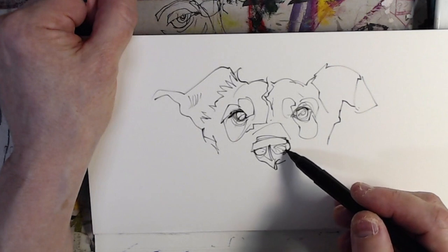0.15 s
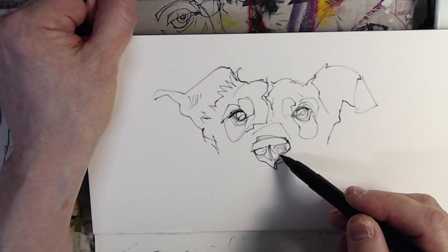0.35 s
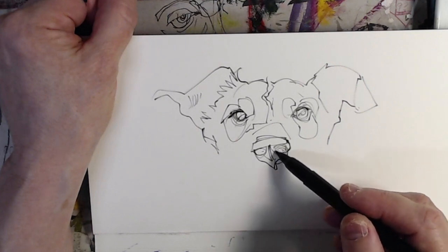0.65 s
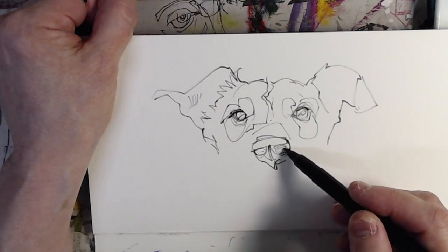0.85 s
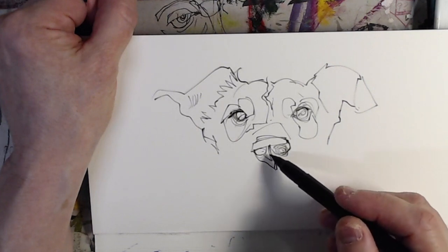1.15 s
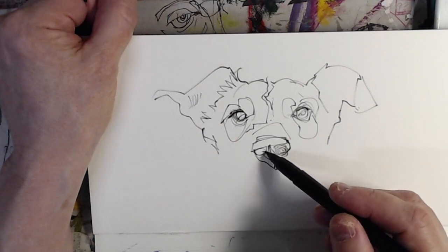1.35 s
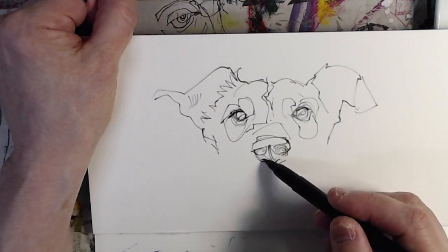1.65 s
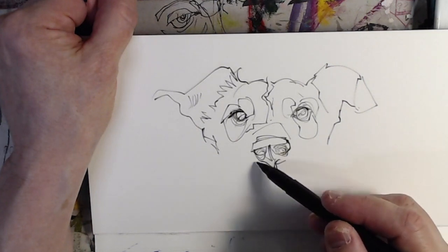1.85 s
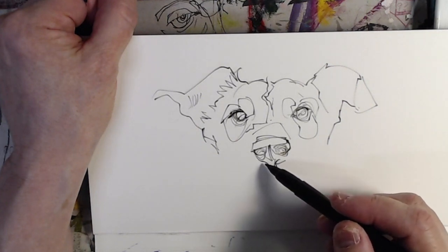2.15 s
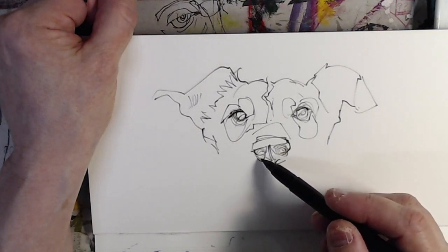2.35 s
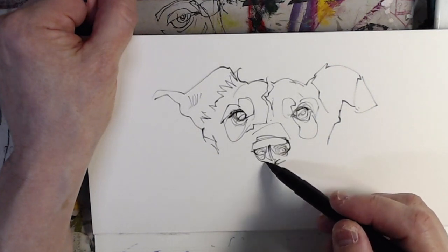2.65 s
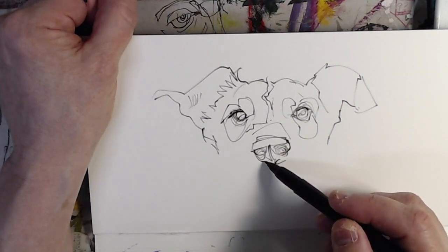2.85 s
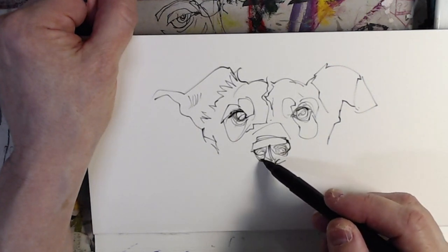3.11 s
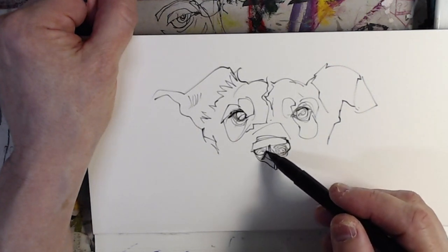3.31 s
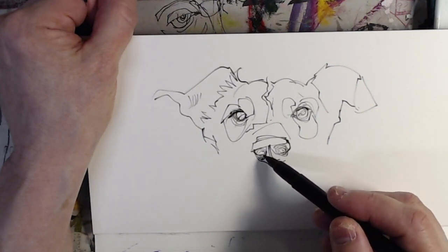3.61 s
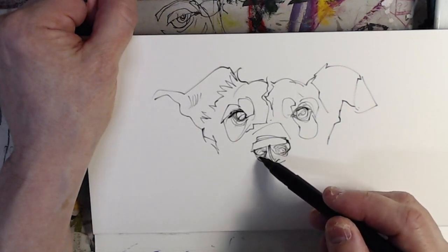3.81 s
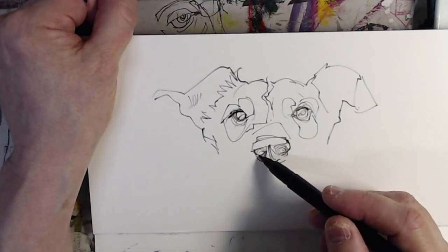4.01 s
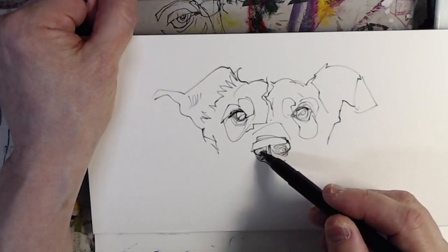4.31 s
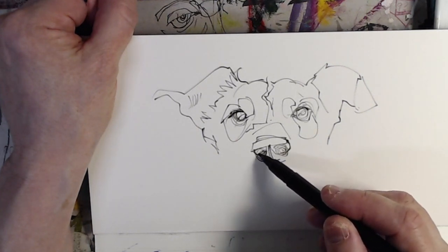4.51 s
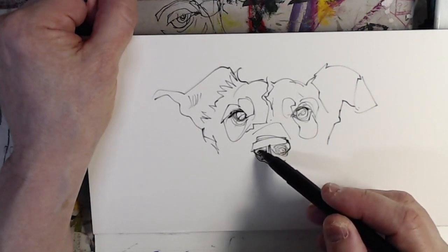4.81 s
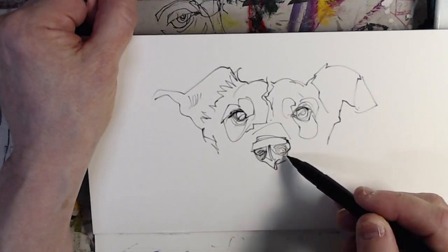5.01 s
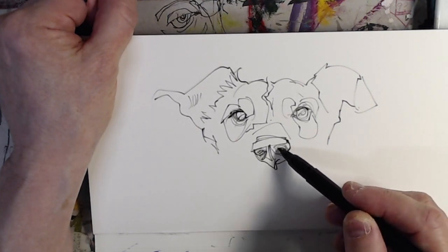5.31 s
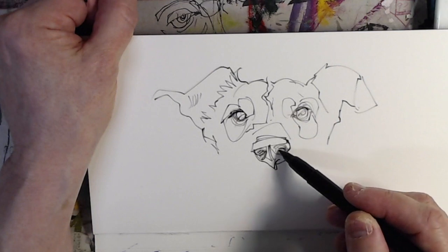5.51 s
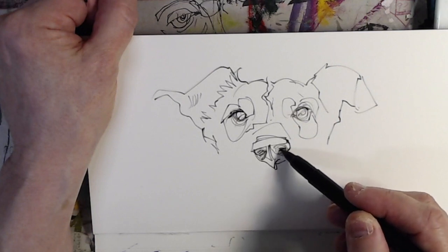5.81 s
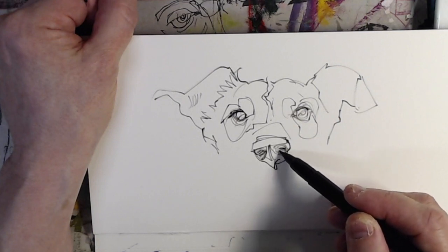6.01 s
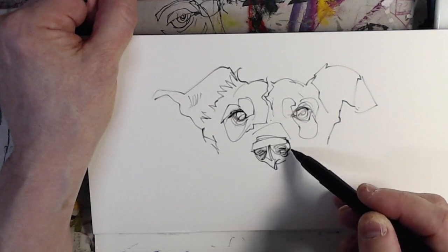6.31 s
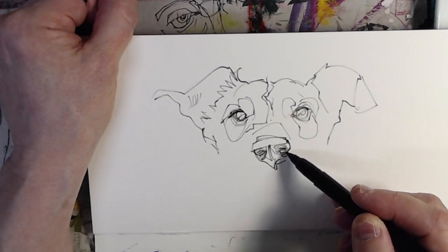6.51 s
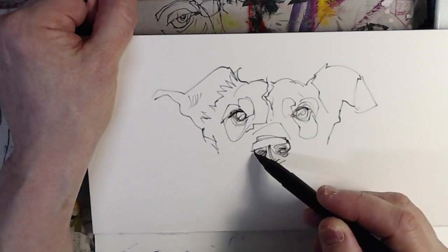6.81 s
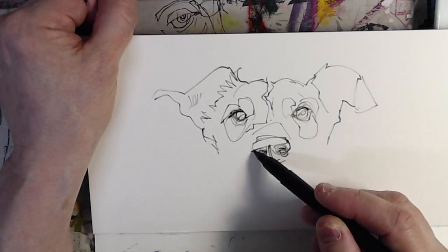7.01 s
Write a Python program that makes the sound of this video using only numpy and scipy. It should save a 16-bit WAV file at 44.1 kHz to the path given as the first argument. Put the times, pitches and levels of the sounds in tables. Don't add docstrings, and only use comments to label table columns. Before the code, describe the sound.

A close mono pickup in a small, quiet room, with muffled upper treble. Throughout, distant engines and traffic drone through the walls: a deep hum around 70 and 140 Hz, throbbing and wavering, with soft tyre wash swelling near 0.3 and 5.3 s, plus very faint hiss and electronic whine. From 0.2 to 1.0 s a dry fiber tip scratches grainy paper in slow, uneven strokes, with small dull snaps around 0.25 and 0.8. A soft skin brush passes at 1.1; more gentle strokes follow from 1.4 to 1.9. The pen then rests. At about 2.95 a tiny high stuttering squeak sounds. Light hatching begins at 3.2, becoming quick, regular scratches from 3.9 to 4.9. Stronger, raspier shading runs from 5.3 to 5.9, then thins out by 6.2. A fuller hand slide comes at 6.6, and one last faint scratch with a tick at 7.1.

```python
import sys
import numpy as np
from scipy import signal
from scipy.fft import rfft, irfft, next_fast_len
from scipy.io import wavfile
from scipy.ndimage import uniform_filter1d

SR = 44100
rng = np.random.default_rng(int(sys.argv[2]) if len(sys.argv) > 2 else 0)


def gain_from_db(level_db):
    decades = np.asarray(level_db, float) / 20
    return 10 ** decades


def inscribe(sig):
    pcm = np.round(np.clip(np.atleast_2d(sig).T, -1, 1) * 32767)
    wavfile.write(sys.argv[1], SR, pcm.astype(np.int16))


N = 315315
T = np.arange(N) / SR


def rms_one(x):
    return x / np.sqrt(np.mean(x ** 2) + 1e-20)


def in_time(rows):
    s, *columns = np.transpose(rows)
    return [np.interp(T, s, column) for column in columns]


def drift(rate):
    r = np.exp(-80 * np.pi * rate / SR)
    noise = rng.standard_normal(N // 40 + 2002)
    slow = signal.lfilter([1], [1, -2 * r, r * r], noise)[2000:]
    return np.interp(np.arange(N) / 40, np.arange(len(slow)), rms_one(slow))


def resonate(x, modes):
    out = 0
    for k, (hz, width_hz, db) in enumerate(modes):
        r = np.exp(-np.pi * width_hz / SR)
        top = [(1 - r * r) / 2, 0, (r * r - 1) / 2]
        bottom = [1, -2 * r * np.cos(2 * np.pi * hz / SR), r * r]
        out = out + (-1) ** k * gain_from_db(db) * signal.lfilter(top, bottom, x)
    return out


def coloured(points):
    size = next_fast_len(N)
    hz, db = np.transpose([(1, -90), *points, (SR / 2, -120)])
    bin_hz = np.arange(size // 2 + 1) * SR / size
    shape = gain_from_db(np.interp(np.log(bin_hz + 1), np.log(hz), db))
    return rms_one(irfft(rfft(rng.standard_normal(size)) * shape, size)[:N])


def edge(x, hz, kind, order):
    return signal.sosfilt(signal.butter(order, hz, kind, fs=SR, output="sos"), x)


def swing(s, rise, fall, power):
    near = slice(max(round((s - 4 * rise) * SR), 0), round((s + 4 * fall) * SR))
    t = T[near] - s
    return near, np.exp(-np.where(t < 0, np.abs(t / rise) ** power, (t / fall) ** 2))


def fades(rows, half):
    out = np.zeros(N)
    for s, db in rows:
        near, dip = swing(s, half, half, power=2)
        out[near] -= db * dip
    return out


def tooth(per_s, spread_db, clump_db):
    heights = gain_from_db(spread_db * np.minimum(rng.exponential(1, N), 5))
    sizes = heights * rng.choice([-1, 1], N)
    return rms_one(sizes * (rng.random(N) < per_s / SR) * gain_from_db(clump_db * drift(74)))


# pitch_hz, level_db (per Hz)
FLOOR = [(15, -8.5), (30, -2.5), (100, -9), (220, -15), (400, -27), (1450, -37), (3000, -44), (4500, -46),
         (6650, -51.5), (7300, -54), (8200, -51)]


def room_air():
    return gain_from_db(-49) * coloured(FLOOR)


# pitch_hz, level_db
WHINES = [(721, -75.5), (4080, -95), (4110, -76), (6401, -100.5), (6509, -91.5), (6999, -92), (7200, -99),
          (7500, -99)]


def whines():
    out = 0
    for hz, db in WHINES:
        out = out + np.sqrt(2) * gain_from_db(db + 0.6 * drift(2.8)) * np.sin(2 * np.pi * hz * T)
    return out


def clock():
    frame_hz, clock_hz = 30, 8000
    gate = np.cos(2 * np.pi * frame_hz * (T - .012)) > 0
    on = uniform_filter1d(1. * gate, size=60)
    swell = .68 + .32 * np.cos(2 * np.pi * (T - 1.06) / 1.125)
    return gain_from_db(-92.5) * on * swell * np.sin(2 * np.pi * clock_hz * T)


# time_s, level_db
TRAFFIC = [(0, -61.5), (.3, -55.5), (1.27, -57.5), (1.9, -61), (2.39, -64.5), (3.5, -65), (4.06, -63),
           (4.58, -59.5), (4.96, -64), (5.3, -53.5), (5.67, -56), (6.27, -56), (7.15, -59.5)]
# time_s, level_db
RUMBLE = [
    (0, -46),
    (1.6, -51),
    (3, -45.5),
    (4.6, -44.5),
    (5.9, -43.5),
    (7.15, -54),
]
# pitch_hz, width_hz, level_db
ROOM_MODES = [(33.3, 1.4, -0.5), (70, 17, 1), (105.6, 11, 0), (126.6, 14.3, 2), (167.8, 10.8, -2.5),
              (193.7, 14, -5), (243, 5.5, -14.5)]
# pitch_hz, width_hz, level_db
DRONE = [(266.8, 27, -1.5), (313.7, 45, -2)]
# pitch_hz, level_db (per Hz)
WASH = [(300, 0.5), (400, 0), (600, 4.5), (720, 2.5), (1000, 3), (1300, -7), (2000, -31.5), (3500, -31)]
DRONE_DB, DRONE_FOLLOWS = -60, 1.1


def traffic():
    (wash_db,), (rumble_db,) = in_time(TRAFFIC), in_time(RUMBLE)
    drone_db = DRONE_DB + DRONE_FOLLOWS * (wash_db - np.mean(wash_db))

    def ringing(modes):
        noise = rng.standard_normal(N + SR)
        return rms_one(resonate(resonate(noise, modes), modes)[SR:])

    rumble = gain_from_db(rumble_db) * ringing(ROOM_MODES)
    drone = gain_from_db(drone_db - 1.5) * ringing(DRONE)
    wash = gain_from_db(wash_db - 4.0 + 2.1 * drift(12.0)) * coloured(WASH)
    return rumble + drone + wash


def firing(hz, levels_db, waver_db):
    turn = 2 * np.pi * np.cumsum(hz) / SR
    out = 0
    for order, db in enumerate(levels_db, start=1):
        level = np.sqrt(2) * gain_from_db(db + waver_db * drift(1.4))
        out = out + level * np.sin(order * turn + 2 * np.pi * rng.random())
    return out


# time_s, firing_hz, order_2_level_db, load_db
ENGINE = [(0, 70, -47.5, -11), (.45, 70, -40.5, -8.5), (.9, 70.1, -45.5, -5), (1.35, 70, -37.5, -2),
          (1.75, 69.8, -38, 1.5), (2.05, 69.02, -38.5, 2.5), (2.4, 68.8, -44, 2), (2.99, 68.75, -39, -1.5),
          (3.45, 69.4, -40.5, -7), (3.7, 69.04, -41, -2), (4.05, 68.5, -35.5, -9.5), (4.4, 68.3, -43, -7),
          (4.85, 68, -44, -13.5), (5.12, 67.42, -35.5, -7), (5.6, 67.1, -45, -3), (6, 66.27, -44.5, -5.5),
          (6.4, 65.8, -52, 0.5), (7.15, 64.2, -57, -6.5)]
# time_s, firing_hz, level_db
SECOND_ENGINE = [(0, 74.03, -37), (.65, 73.46, -52), (1.3, 72.78, -55.5), (1.62, 71.7, -38.5),
                 (1.95, 72.1, -49), (2.4, 73.6, -58), (2.95, 74.26, -60.5), (3.3, 74.6, -49),
                 (3.85, 75.4, -49), (4.23, 75.4, -39), (4.6, 75.2, -49.5), (5.2, 75.08, -38.5),
                 (5.52, 75, -55), (6.05, 73.5, -42), (6.5, 73.57, -58), (7.15, 74.4, -56)]
# time_s, firing_hz, level_db
THIRD_ENGINE = [(0, 63, -62), (.8, 62.94, -49), (1.5, 61.36, -54.5), (2.2, 59.6, -56.5),
                (3.001, 57.1, -58.5), (3.6, 54.2, -63.5), (4, 51.4, -77)]
# time_s, pitch_hz, level_db
GEAR = [(0, 161.7, -75.5), (2.001, 162.2, -54.5), (3.403, 160.8, -51), (3.901, 171.4, -53),
        (4.402, 170, -49.5), (5, 169.6, -53), (5.6, 165.6, -62), (6.201, 166.8, -54), (6.7, 168.5, -51),
        (7.15, 169.6, -54.5)]
# time_s, depth_db
THROB_FADES = [(.57, 10), (.78, 10.5), (1.04, 13), (1.27, 10), (1.43, 12), (1.61, 11), (1.83, 7.5),
               (2.17, 10), (2.41, 5), (3.19, 4.5), (3.66, 6), (4.42, 7), (4.7, 12), (4.98, 18), (5.2, 10.5),
               (5.46, 17), (5.69, 7), (5.93, 19), (6.09, 11), (6.21, 13), (6.45, 19), (6.63, 13), (6.9, -2)]
# time_s, depth_db
BOOM_FADES = [(.55, 13), (.95, 2), (1.36, 9), (1.83, 4), (2.09, 7), (2.35, 17), (3.04, 8), (3.65, 8),
              (4.42, 4.5), (5.45, 12), (5.62, 13), (5.93, 6), (6.23, 9), (6.6, 10)]
# time_s, lift_db, rise_s, fall_s
SURGE = (5.48, 26, 0.24, .17)
FIRST_DB, THIRD_DB, FOURTH_DB = -47, -55, -74
THROB_DB, THROB_PER_S, BOOM_DB, BOOM_PER_S = 0.33, 8.6, 1.85, 4
THROB_FADE_S, BOOM_FADE_S = 0.049, 0.027


def engines():
    hz, throb_db, load_db = in_time(ENGINE)
    second_hz, second_db = in_time(SECOND_ENGINE)
    third_hz, third_db = in_time(THIRD_ENGINE)
    gear_hz, gear_db = in_time(GEAR)
    lift_db = BOOM_DB * drift(BOOM_PER_S) + fades(BOOM_FADES, BOOM_FADE_S)
    throb_db = throb_db + THROB_DB * drift(THROB_PER_S) + fades(THROB_FADES, THROB_FADE_S)
    s, surge_db, rise, fall = SURGE
    near, surge = swing(s, rise, fall, power=2.4)
    fourth_db = np.full(N, 1. * FOURTH_DB)
    fourth_db[near] += surge_db * surge
    nearer = firing(hz, [FIRST_DB + lift_db, throb_db, THIRD_DB + load_db, fourth_db], waver_db=1.3)
    second = firing(second_hz, [second_db + lift_db, second_db - 10], waver_db=2.8)
    third = firing(third_hz, [third_db, third_db - 6.5], waver_db=0.0)
    return nearer + second + third + firing(gear_hz, [gear_db], waver_db=3.0)


def room(x):
    t = np.arange(round(.3 * SR)) / SR
    tail = rng.standard_normal(len(t)) * gain_from_db(-60 * t / 0.72) * (t > .004)
    return signal.fftconvolve(x, tail / np.sqrt(np.sum(tail ** 2)))[:N]


# pitch_ratio, level_db
SQUEAK_PARTIALS = [(1, 0), (1.18, -17), (1.375, -19)]
SQUEAK_S, SLIP_S, SLIP_HALF_S, SQUEAK_HZ = 2.955, .0195, .005, 4695
SQUEAK_DB, SQUEAK_LOSS_DB_PER_S, SLIP_SPREAD_DB = -56, 100, .7
SLIPS, FIRM_SLIPS = 9, 4
LET_GO_DB, WEAK_SLIP_DB = -3, -10
SLIP_DRAG = .12


def squeak():
    out = np.zeros(N)
    phases = 2 * np.pi * rng.random(3)
    for k, (pitch_chance, level_chance) in enumerate(rng.standard_normal((SLIPS, 2))):
        late = k * SLIP_S
        firm = k < FIRM_SLIPS
        db = SQUEAK_DB - SQUEAK_LOSS_DB_PER_S * late + SLIP_SPREAD_DB * level_chance
        if not firm:
            db += LET_GO_DB + WEAK_SLIP_DB * (k % 2 == 0)
        fall = SLIP_HALF_S + SLIP_DRAG * late * firm
        near, slip = swing(SQUEAK_S + late, SLIP_HALF_S, fall, power=1.6)
        cycles = SQUEAK_HZ * T[near] + 8 * pitch_chance * (T[near] - SQUEAK_S - late)
        for (ratio, part_db), phase in zip(SQUEAK_PARTIALS, phases):
            level = gain_from_db(db + part_db - 150 * (ratio - 1) * late)
            out[near] += slip * level * np.sin(2 * np.pi * ratio * cycles + phase)
    return out


# peak_s, level_db, rise_s, fall_s
SLIDES = [
    (1.135, -61, 0.062, .04),
    (6.602, -56, 0.065, 0.057),
]
# pitch_hz, width_hz, level_db
SKIN = [(1340, 280, 1.5), (2420, 430, -1), (3080, 540, 1.5), (5260, 1200, -9.5), (6860, 500, -11.5)]


def hand():
    touch = tooth(per_s=20000, spread_db=1, clump_db=.7)
    gain = np.zeros(N)
    for s, db, rise, fall in SLIDES:
        near, speed = swing(s, rise, fall, power=1.3)
        gain[near] += speed * gain_from_db(db)
    return gain * rms_one(resonate(touch, SKIN))


# time_s, level_db
SNAGS = [(.245, -31), (0.438, -40), (0.7836, -32), (.7855, -30), (0.8106, -39), (0.846, -31), (1.682, -42),
         (1.721, -45), (1.845, -50), (3.477, -44), (3.496, -41.5), (3.849, -45), (4.122, -51.5),
         (4.296, -35.5), (4.48, -44), (4.579, -42), (4.752, -37), (5.843, -38), (6.276, -47), (7.068, -42)]
# pitch_hz, width_hz, level_db
SNAP = [(1050, 500, 1), (2000, 1100, 0), (4300, 2500, -17)]


def snags():
    clicks = np.full(N, 1e-18)
    for s, db in SNAGS:
        clicks[round(s * SR)] = gain_from_db(db + 14)
    return edge(resonate(clicks, SNAP), 5500, "low", order=2)


# peak_s (fastest motion), level_db, rise_s, fall_s, pressure_db
OUTLINES = [(.252, -56.5, 0.054, 0.01, -2.5), (.36, -61.5, 0.092, .045, -8),
            (.446, -55.5, .008, 0.027, -1.5), (.492, -50, 0.033, 0.045, -1), (0.569, -61, 0.033, 0.026, -3),
            (.71, -60, 0.1, 0.036, -6), (.787, -51.5, 0.0043, 0.043, 0), (.842, -57, 0.012, 0.051, -1.5),
            (.965, -61, 0.059, 0.017, -5.5), (1.44, -61.5, 0.065, .045, 3), (1.575, -60.5, 0.063, .05, -4),
            (1.688, -58, .008, .025, -1), (1.725, -59, 0.03, 0.043, 5), (1.844, -62, 0.065, 0.013, -3.5)]
# peak_s, level_db, length_s, pressure_db, slant_db (extra hiss)
HATCHING = [(3.189, -58.5, 0.019, -1, 1.5), (3.238, -65.5, 0.014, 0, 0), (3.4, -65, 0.019, -2, 0),
            (3.489, -65, .017, 7, -2), (3.566, -70.5, 0.013, 0.5, -5), (3.781, -64.5, .02, 1, 4.5),
            (3.866, -58, .014, -3.5, 2), (3.963, -54.5, 0.019, 0, -1), (4.052, -53, 0.018, -3.5, 1.5),
            (4.141, -58, .018, 2, 5), (4.226, -56.5, .014, -6, -1.5), (4.31, -68.5, 0.014, 12, 6),
            (4.315, -57, 0.016, -3.5, -3.5), (4.413, -53.5, .011, -3.5, -1), (4.5, -57.5, .015, 0, -4.5),
            (4.59, -56.5, .012, -1, 2), (4.667, -52, 0.014, 0.5, 1.5), (4.755, -59, .01, 1.5, 0),
            (4.846, -64.5, 0.01, -1, 4), (4.888, -69.5, .008, -17, -1), (4.979, -68.5, 0.013, -10, 3)]
# peak_s, level_db, length_s, pressure_db, slant_db (extra hiss)
SHADING = [(5.302, -51.5, 0.023, 3, -0.5), (5.398, -54.5, 0.019, -3.5, 0.5), (5.494, -48, .014, 0.5, -4),
           (5.592, -54, 0.019, -8.5, -2), (5.683, -50.5, 0.017, 0.5, -0.5), (5.776, -53.5, .013, -4, -2.5),
           (5.857, -50.5, .014, 2, -3.5), (5.951, -62, .015, -2, 0.5), (6.064, -62, .019, 2, 3),
           (6.143, -68.5, 0.039, 0.5, 1), (6.229, -59, 0.016, -1.5, 2), (7.077, -64.5, .016, -2, -4.5)]
RISE_SHARE, FALL_SHARE = 1.33, 1.14
OUTLINE_HISS_DB, OUTLINE_HISS_PER_PRESSURE = 0, 0.38
OUTLINE_RASP_DB, OUTLINE_RASP_PER_PRESSURE = 2, -0.54


def strokes():
    out = []
    for s, db, rise, fall, press in OUTLINES:
        hiss_db = OUTLINE_HISS_DB + OUTLINE_HISS_PER_PRESSURE * press
        rasp_db = OUTLINE_RASP_DB + OUTLINE_RASP_PER_PRESSURE * press
        out.append((s, db, rise, fall, 1.6, hiss_db, rasp_db, press))
    for s, db, length, press, slant in [*HATCHING, *SHADING]:
        rise, fall = RISE_SHARE * length, FALL_SHARE * length
        out.append((s, db, rise, fall, 2.8, slant, 0.28 * slant, press))
    return out


# pitch_hz, width_hz, level_db
SHEET = [(1657, 160, -5.5), (1870, 110, 2.5), (2110, 370, -4)]
# pitch_hz, width_hz, level_db
BOARD = [(852, 110, 1), (1014, 117, 5), (1158, 63, 2), (1321, 77, -2)]
# pitch_hz, width_hz, level_db
FIBRES = [(3350, 720, 20.5), (4000, 360, -16), (4450, 410, -10), (4800, 330, -3.5), (5400, 300, -22),
          (6260, 870, 1.5), (6460, 360, -19.5), (7000, 400, -20)]
# pitch_hz, width_hz, level_db
RASP = [(2320, 230, -3), (2530, 200, 3), (2855, 180, 4.5)]
# peak_s, level_db
FLEXES = [(.46, -64), (0.521, -62.5), (1.707, -59.5), (4.318, -54.5), (4.508, -59.5), (4.68, -52.5),
          (5.319, -54.5), (5.497, -59.5), (5.677, -56), (5.88, -60)]
# pitch_hz, width_hz, level_db
FLEX_MODES = [(465, 11, 3), (542, 23, -8.5)]
# pitch_hz, width_hz
SHADOWS = [(5250, 230)]
SPEED_POWERS = [
    [0.88],
    [0.74],
    [1.2],
    [1.1],
]
HISS_DB, HISS_PER_PRESSURE = -8, -.8
RASP_DB, RASP_PER_PRESSURE = -6.5, -0.19
SHEET_TOP_HZ, FIBRE_FOOT_HZ = 3010, 3320


def pen():
    gains = np.zeros((5, N))
    for s, db, rise, fall, power, hiss_db, rasp_db, press in strokes():
        near, speed = swing(s, rise, fall, power)
        hiss_db += HISS_DB + HISS_PER_PRESSURE * press
        rasp_db += RASP_DB + RASP_PER_PRESSURE * press
        shares_db = np.array([[-1], [press], [hiss_db], [rasp_db]])
        gains[:4, near] += speed ** np.array(SPEED_POWERS) * gain_from_db(db + shares_db)
    for s, db in FLEXES:
        near, speed = swing(s, .026, .028, power=2)
        gains[4, near] += speed * gain_from_db(db)
    grain = tooth(per_s=11000, spread_db=2.0, clump_db=1.4)
    parts = []
    for gain, body in zip(gains, (SHEET, BOARD, FIBRES, RASP, FLEX_MODES)):
        parts.append(resonate(grain * gain, body) / np.std(resonate(grain, body)))
    sheet, board, fibres, rasp, flex = parts
    low = edge(sheet + board + rasp + flex, SHEET_TOP_HZ, "low", order=4)
    out = low + edge(fibres, FIBRE_FOOT_HZ, "high", order=4)
    for hz, width_hz in SHADOWS:
        out = out - 0.89 * resonate(out, [(hz, width_hz, 0)])
    return out


def scene():
    desk = pen() + snags() + hand() + squeak()
    background = engines() + traffic() + room_air() + whines()
    return (desk + gain_from_db(-19.0) * room(desk) + background)[None]


def roll_off(x):
    return signal.sosfilt(signal.butter(12, 8080, fs=SR, output="sos"), x)


def record(dry):
    mix = edge(dry, 7300, "low", order=20) + clock()
    return roll_off(mix)


dry = scene()
out = record(dry)
inscribe(out)
```